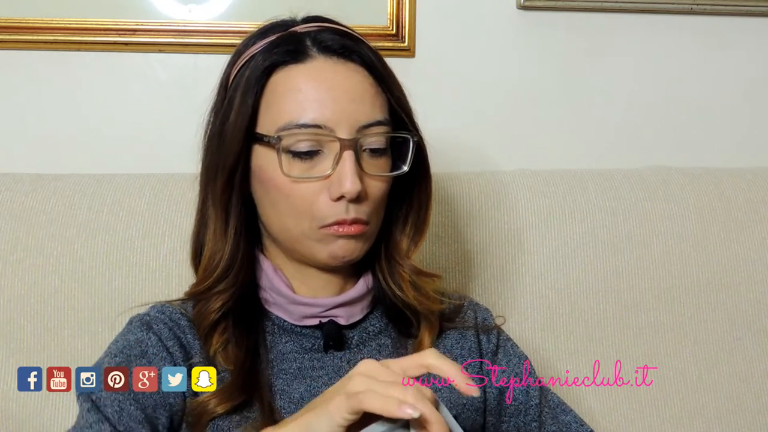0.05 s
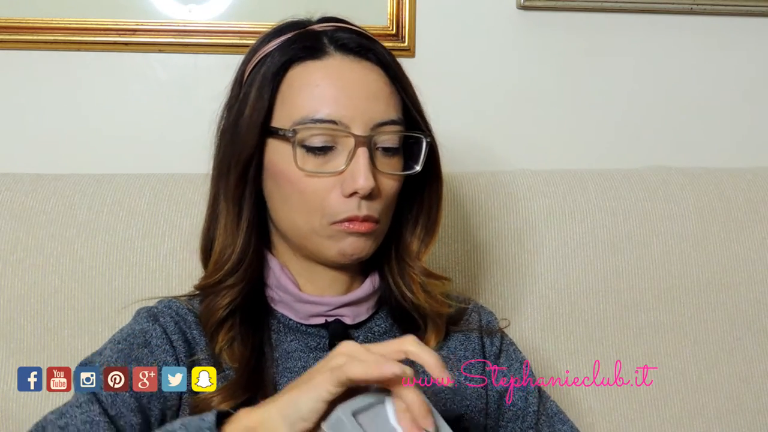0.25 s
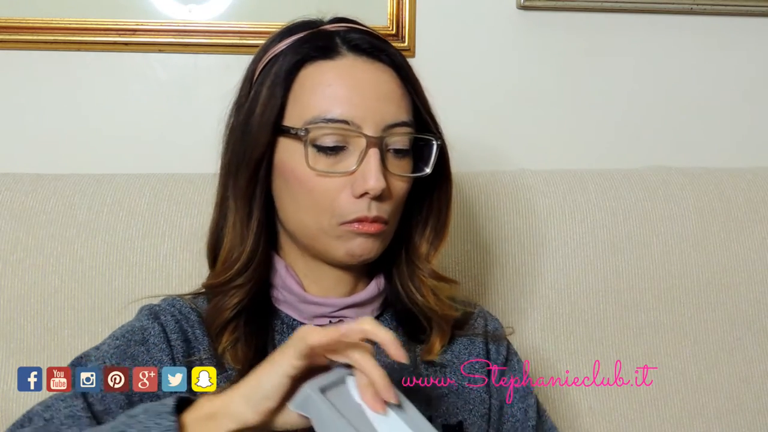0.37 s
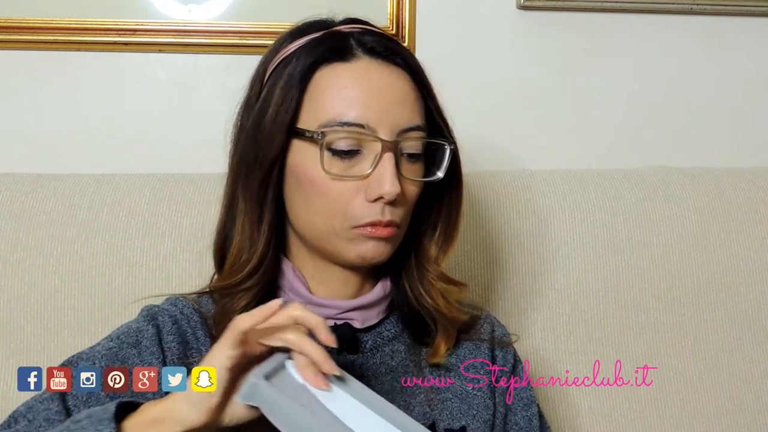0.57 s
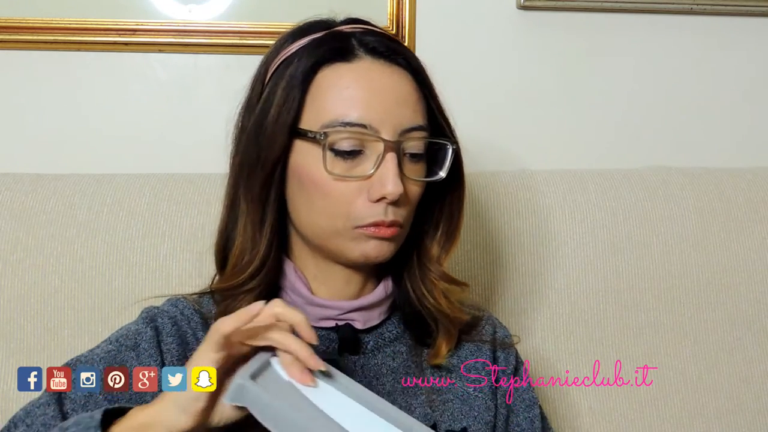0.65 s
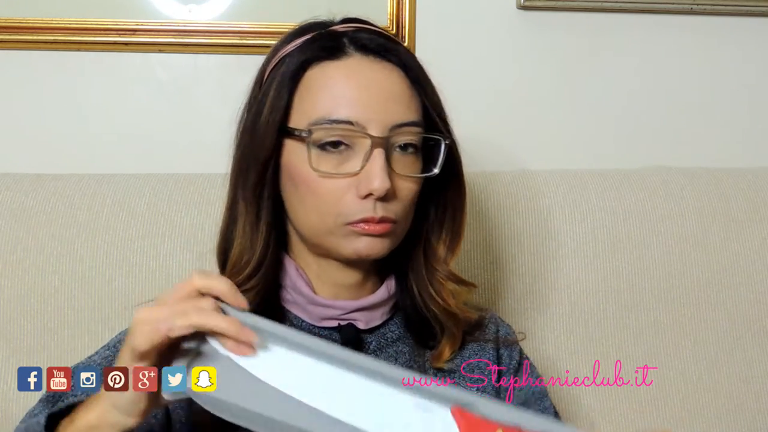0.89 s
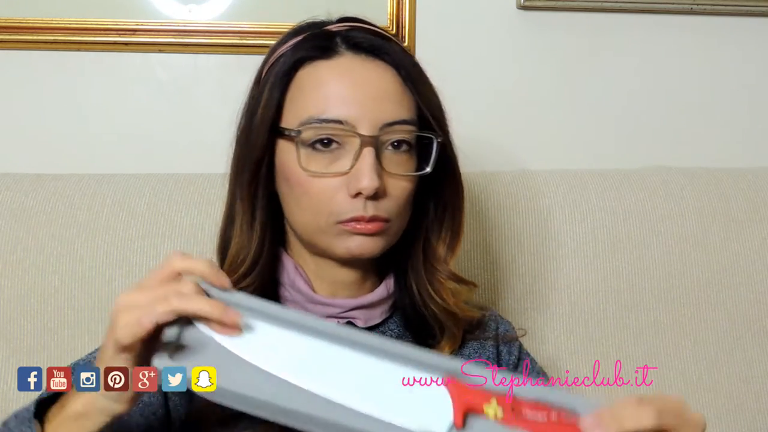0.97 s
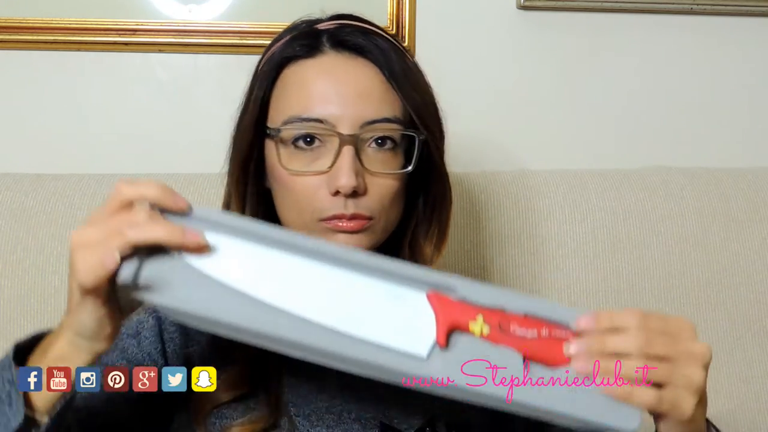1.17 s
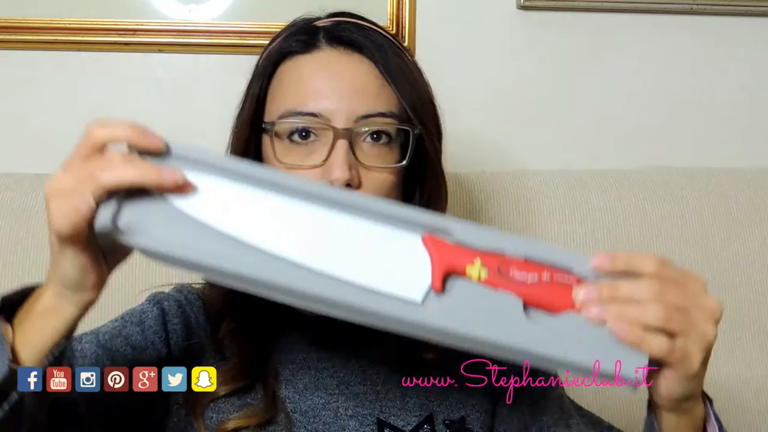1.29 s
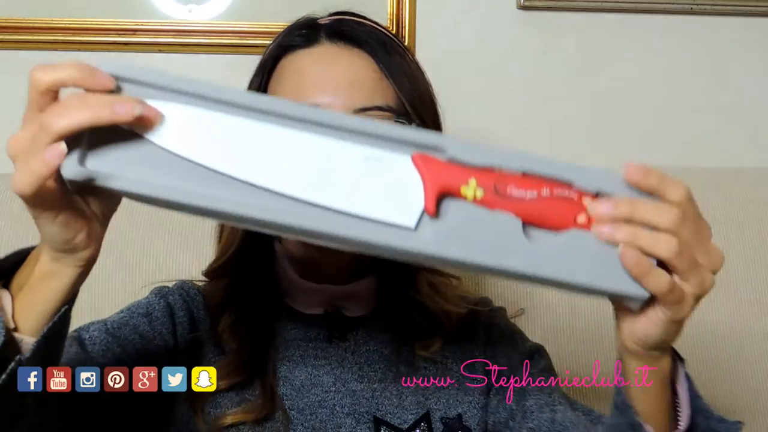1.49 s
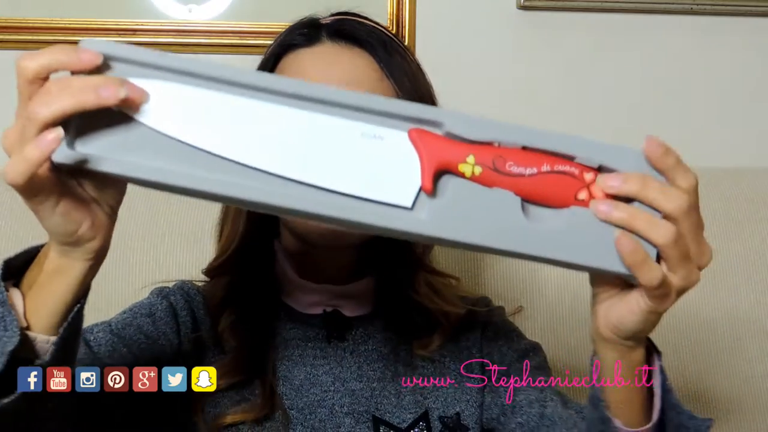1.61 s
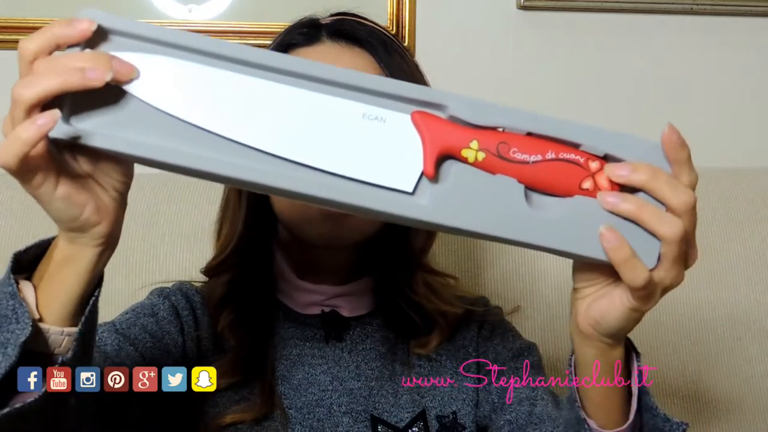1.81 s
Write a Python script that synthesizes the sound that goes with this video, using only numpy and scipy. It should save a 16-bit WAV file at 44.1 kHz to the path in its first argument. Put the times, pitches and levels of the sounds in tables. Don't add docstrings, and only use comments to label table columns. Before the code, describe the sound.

A hollow cardboard knife box is handled close to the microphone: a faint finger slide, light ticks and one sharp knock, then small plastic clicks, dull thumps and rubbing card in a furnished, slightly ringing room.

```python
import sys
import numpy as np
from scipy import signal
from scipy.io import wavfile

SR = 44100
rng = np.random.default_rng(int(sys.argv[2]) if len(sys.argv) > 2 else 0)


def unload_audio(sound):
    columns = np.transpose(np.atleast_2d(sound))
    steps = np.round(np.clip(columns, -1, 1) * 32767)
    wavfile.write(sys.argv[1], SR, steps.astype(np.int16))


def decibels_to_gain(level_db):
    exponent = np.asarray(level_db, float) / 20
    return 10 ** exponent


N = 81585
TIME = np.arange(N) / SR


def at_hz(points, hz):
    table_hz, value = np.transpose(points)
    return np.interp(np.log(hz), np.log(table_hz), value)


def drift(rate_hz):
    step = 40
    r = np.exp(-2 * np.pi * step * rate_hz / SR)
    noise = rng.standard_normal(N // step + 2002)
    slow = signal.lfilter([1], [1, -2 * r, r * r], noise)[2000:]
    return np.interp(np.arange(N) / step, np.arange(len(slow)), slow / slow.std())


def ring(clicks, hz, t60):
    r = decibels_to_gain(-60 / (t60 * SR))
    w = 2 * np.pi * hz / SR
    return signal.lfilter([0, np.sin(w)], [1, -2 * r * np.cos(w), r * r], clicks + 1e-18)


def low_pass(x, order, hz):
    return signal.sosfilt(signal.butter(order, hz, fs=SR, output="sos"), x)


def band_pass(x, order, low_hz, high_hz):
    return signal.sosfilt(signal.butter(order, [low_hz, high_hz], "band", fs=SR, output="sos"), x)


EDGES = 22 * 2 ** np.arange(0, 9.7, 1 / 3)


def bands(sources):
    for k, (low, high) in enumerate(zip(EDGES, EDGES[1:])):
        yield np.sqrt(low * high), band_pass(sources[k % 2], 2, low, high)


# pitch in [Hz], level in [dB per Hz].
HUSH_COLOUR = [(25, -24), (75, -22.5), (125, -4), (450, -8.5), (1000, -17), (2100, -24), (3500, -22),
               (15500, -34.5)]


def hush():
    out = 0
    for hz, band in bands(rng.standard_normal((2, N))):
        out = out + decibels_to_gain(at_hz(HUSH_COLOUR, hz) + 1.3 * drift(18)) * band
    return decibels_to_gain(-63.5) * out / out.std()


# pitch in [Hz], time to fall 60 dB in [s].
ROOM_DECAY = [(120, 0.51), (400, 0.44), (1000, 0.59), (2500, 0.59), (5000, 0.54), (12000, 0.45)]
# pitch in [Hz], level in [dB].
ROOM_COLOUR = [(120, -6), (450, 1.5), (680, -7), (1000, 2.2), (2000, 1.5), (3500, 1.5), (6000, 3),
               (12000, -5.5)]


def room(x, crack):
    delay_s, build_up_s = 0.0075, 0.0072
    room_db, crack_db = -9, 6.5
    x = low_pass(x, 1, 3600)
    t = TIME[:SR]
    tail, wash = 0, 0
    energy = np.roll(crack, int(delay_s * SR)) ** 2
    for hz, band in bands(rng.standard_normal((2, N))):
        keep = decibels_to_gain(-120 / (at_hz(ROOM_DECAY, hz) * SR))
        band = band * decibels_to_gain(at_hz(ROOM_COLOUR, hz)) * np.sqrt(1 - keep)
        tail = tail + band[:SR] * keep ** (t * SR / 2)
        wash = wash + band * np.sqrt(signal.lfilter([1], [1, -keep], energy + 1e-18))
    tail = tail * np.clip((t - delay_s) / build_up_s, 0, 1)
    wash = band_pass(wash, 1, 1200, BOX_CRACK[2])
    return decibels_to_gain(room_db) * (signal.fftconvolve(x, tail)[:N] + decibels_to_gain(crack_db) * wash)


# start in [s], rise in [s], hold in [s], level in [dB],
# brightness in [dB per octave].
FINGER_SLIDES = [
    (.010, 0.0085, 0.0067, -51, 1.5),
    (0.066, 0.029, 0.0094, -62, -1),
    (0.414, 0.088, 0.0042, -55, 1.5),
    (0.629, 0.018, 0.047, -49.5, 3.5),
    (0.698, .02, 0.036, -67.5, 2.2),
    (0.879, 0.0014, .012, -60.5, 3),
    (1.047, 0.033, 0.034, -59.5, 6.5),
    (1.198, 0.019, 0.0053, -51.5, -0.5),
    (1.332, 0.012, 0.011, -59.5, -1),
]
SLIDE_FALL = [470, 362, 590, 1550, 304, 295, 500, 306, 207]
# time in [s], level in [dB], brightness in [dB per octave].
LIFT_SLIDE = [(0.867, -82, 1), (0.882, -69, -2), (0.908, -49.5, 0.7), (.96, -50, -.9), (1.0, -50.5, 1.4),
              (1.04, -46, 1.5), (1.108, -53, -1.1), (1.155, -55.5, 0.8), (1.191, -49, 0),
              (1.218, -55.5, -0.1), (1.26, -53.5, 0.1), (1.325, -56.5, .6), (1.35, -54.5, 0.5),
              (1.443, -54, 0.3), (1.477, -63, 1), (1.52, -57, -.2), (1.80, -54, -0.25), (1.85, -58.5, -0.3)]
# pitch in [Hz], level in [dB per Hz].
CARD_COLOUR = [(100, -7), (200, -9.5), (600, 1), (2100, -6), (3200, -3.5), (4400, -2), (5600, -7.5),
               (15500, -13.5)]


def slide_strokes():
    s, lift_db, lift_tilt = np.transpose(LIFT_SLIDE)
    strokes = [(np.interp(TIME, s, lift_db, left=-120), np.interp(TIME, s, lift_tilt))]
    for (start, rise, hold, db, tilt), fall in zip(FINGER_SLIDES, SLIDE_FALL):
        rising = 1.24 * 20 * np.log10(np.clip((TIME - start) / rise, 1e-6, 1))
        falling = fall * np.maximum(TIME - start - rise - hold, 0)
        strokes.append((db + rising - falling, tilt))
    return strokes


def rubbing():
    grains_per_s, spread_db, patchy_db = 9000, 2, 1.1
    strokes = slide_strokes()
    sizes = decibels_to_gain(spread_db * np.minimum(rng.exponential(1, (2, N)), 5))
    sizes = sizes * rng.choice([-1, 1], (2, N))
    grains = sizes * (rng.random((2, N)) < grains_per_s / SR)
    together = drift(18.6)
    out, power = 0, 0
    for hz, band in bands(grains / grains.std()):
        band = decibels_to_gain(at_hz(CARD_COLOUR, hz)) * band
        if hz > 1500:
            power += np.mean(band ** 2)
        octaves = np.log2(np.clip(hz, 400, 9000) / 3500)
        if hz < 3500:
            octaves = 2.1 * octaves
        pressure = sum(decibels_to_gain(db + tilt * octaves) for db, tilt in strokes)
        patches = decibels_to_gain(patchy_db * (0.97 * together + drift(6.8)))
        out = out + pressure * patches * band
    return out / np.sqrt(power)


# time in [s], peak in [dB], pitch in [Hz], time to fall 60 dB in [s].
SINGLE_RINGS = [(.090, -54, 335, 0.083), (0.152, -45.5, 168, 0.041), (0.2188, -28.5, 169.7, 0.042),
                (0.558, -51, 410, 0.038), (.558, -40, 1190, 0.014), (.9245, -37.5, 292, 0.047),
                (0.942, -35, 1850, 0.02), (.947, -34, 380, 0.032), (.950, -36.5, 244, 0.027),
                (.966, -50, 393, 0.089), (1.2705, -46, 644, 0.054), (1.2752, -40.5, 677, 0.024),
                (1.385, -54, 507, 0.051), (1.6125, -31.5, 287, 0.032)]


def single_rings():
    out = np.zeros(N)
    for s, db, hz, t60 in SINGLE_RINGS:
        push = decibels_to_gain(db) * (np.arange(N) == int(s * SR))
        out += ring(push, hz, t60)
    return low_pass(out, 2, 2000)


def struck(hits, modes, crack):
    s, db, hard = np.transpose(hits)
    at = (s * SR).astype(int)
    scatter_db = 1.5 * rng.standard_normal((len(s), len(modes)))
    ringing = np.zeros(N)
    for k, (hz, level_db, t60) in enumerate(modes):
        clicks = np.zeros(N)
        clicks[at] = decibels_to_gain(db + level_db + hard * np.log2(hz / 2000) + scatter_db[:, k])
        ringing += ring(clicks, hz, t60) * (-1) ** k
    crack_db, t60, corner_hz = crack
    clicks = np.zeros(N)
    clicks[at] = decibels_to_gain(db + crack_db + 2 * hard)
    fading = signal.lfilter([1], [1, -decibels_to_gain(-60 / (t60 * SR))], clicks)
    burst = fading * rng.standard_normal(N)
    return ringing, band_pass(burst, 1, 1200, corner_hz)


# pitch in [Hz], level in [dB], time to fall 60 dB in [s].
TRAY_MODES = [(1850, -5, 0.011), (2710, -8.5, 0.03), (3530, -7, 0.031), (4700, -1.5, 0.0071),
              (5580, -15.5, 0.02), (7030, -19, 0.012)]
# time in [s], peak in [dB], hardness in [dB per octave].
TRAY_CLICKS = [
    (.5565, -45, 6),
    (.5578, -39, 2.1),
    (.9430, -36.5, 0.5),
    (.9443, -29.5, -6),
    (1.2698, -48, 0),
]
# level in [dB], time to fall 60 dB in [s], upper corner in [Hz].
TRAY_CRACK = (-1.8, 0.0065, 6700)


def tray_clicks():
    return struck(TRAY_CLICKS, TRAY_MODES, TRAY_CRACK)


# pitch in [Hz], level in [dB], time to fall 60 dB in [s].
BOX_MODES = [(310, -13, 0.0088), (465, -5.5, 0.055), (709, -5, 0.025), (815, 0, 0.034), (1025, 8, 0.0092),
             (1410, -3.5, 0.028), (1728, -3.5, 0.028), (2807, -3, 0.018), (3060, 0.5, .01),
             (3860, 3, 0.0075), (4656, -11.5, 0.017), (2110, -17, .01), (990, -16, 0.023),
             (5690, -13.5, 0.014)]
# time in [s], peak in [dB], hardness in [dB per octave].
LID_KNOCKS = [
    (.1490, -36.5, 0.3),
    (.1503, -43, 8),
    (.1518, -41, 6.5),
    (.2155, -31.5, -3),
    (.2172, -35, -3.5),
    (.2190, -22, -2.15),
    (.2201, -20.5, 3.1),
    (.2222, -27, 2.65),
    (.2245, -27, -3.5),
    (.236, -40, 3.5),
]
# level in [dB], time to fall 60 dB in [s], upper corner in [Hz].
BOX_CRACK = (1.2, 0.0094, 4200)


def lid_knocks():
    return struck(LID_KNOCKS, BOX_MODES, BOX_CRACK)


def scene():
    box, box_crack = lid_knocks()
    tray, tray_crack = tray_clicks()
    tray = tray + single_rings()
    rub = rubbing()
    tray_wet = decibels_to_gain(-3)
    to_room = box + tray_wet * tray + decibels_to_gain(-1.5) * rub
    echo = room(to_room, box_crack + tray_wet * tray_crack)
    near = box + box_crack + tray + tray_crack + rub + echo
    thin_bass = signal.butter(4, 119, "high", fs=SR, output="sos")
    return (signal.sosfilt(thin_bass, near) + hush())[None]


def roll_off(x):
    return signal.sosfilt(signal.butter(12, 16360, fs=SR, output="sos"), x)


def record(dry):
    overload = 0.5
    rounded = overload * np.tanh(dry / overload)
    top_cut = signal.cheby2(18, 60, 15850, fs=SR, output="sos")
    return roll_off(signal.sosfilt(top_cut, rounded))


dry = scene()
out = record(dry)
unload_audio(out)
```